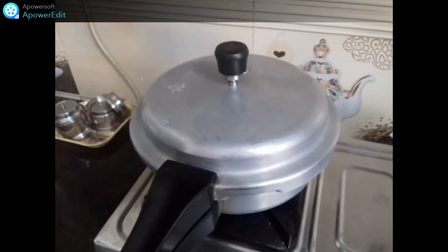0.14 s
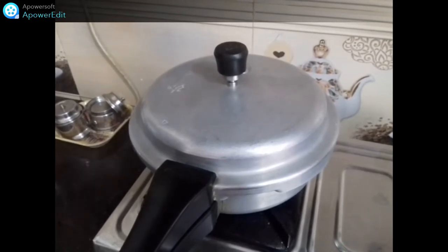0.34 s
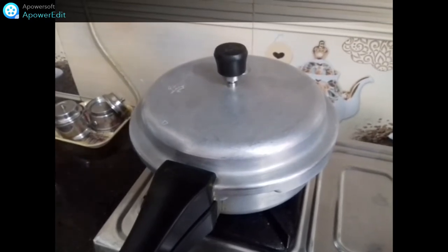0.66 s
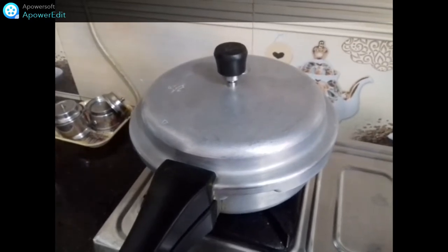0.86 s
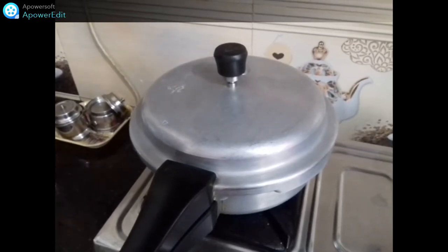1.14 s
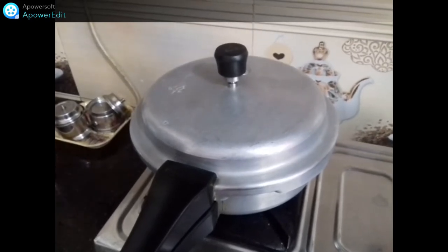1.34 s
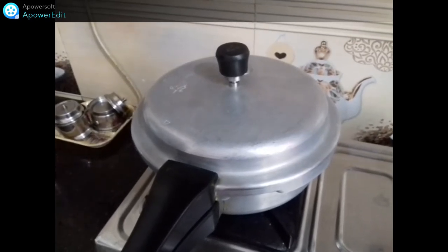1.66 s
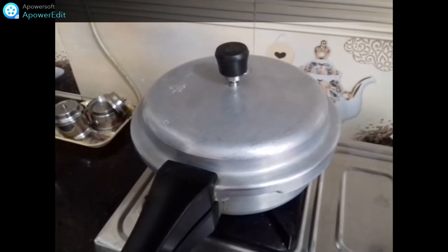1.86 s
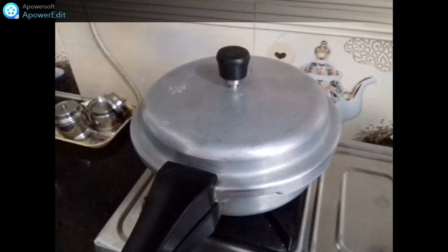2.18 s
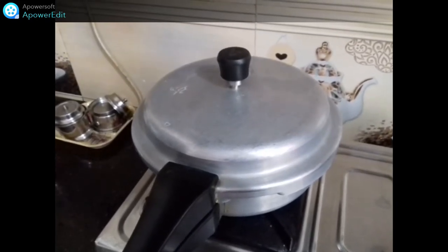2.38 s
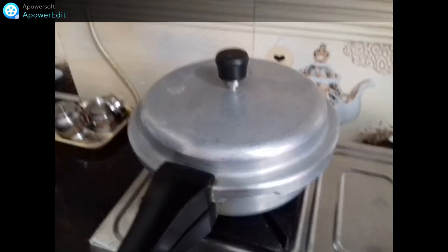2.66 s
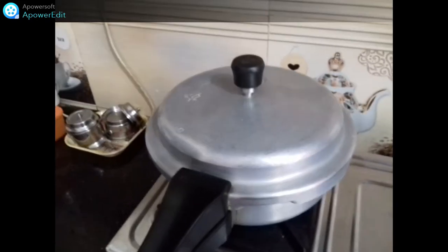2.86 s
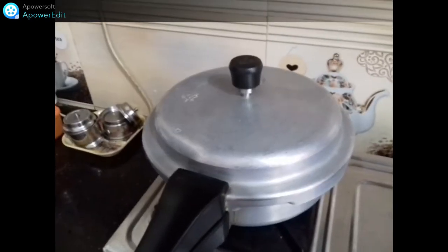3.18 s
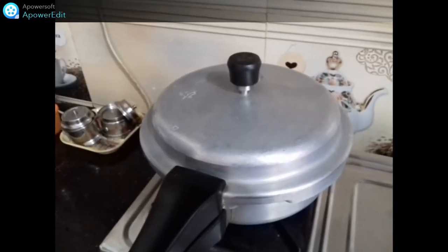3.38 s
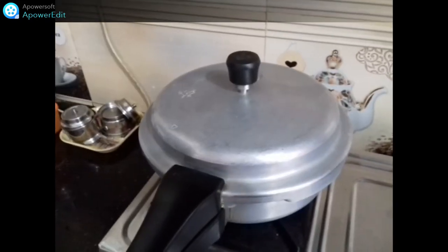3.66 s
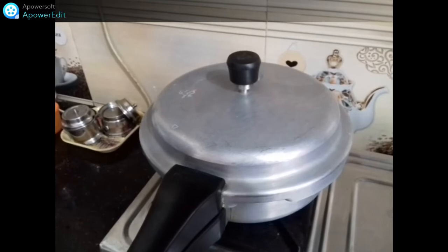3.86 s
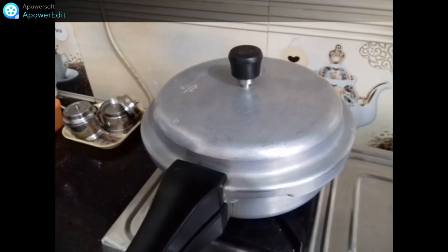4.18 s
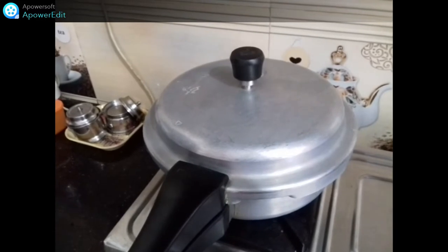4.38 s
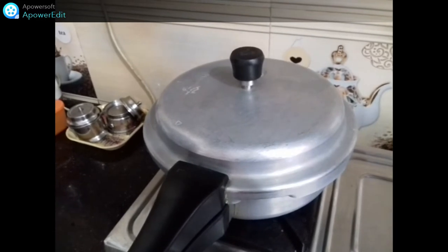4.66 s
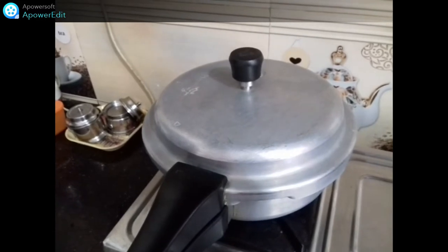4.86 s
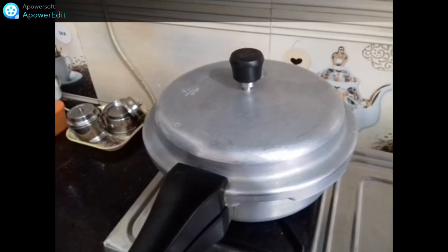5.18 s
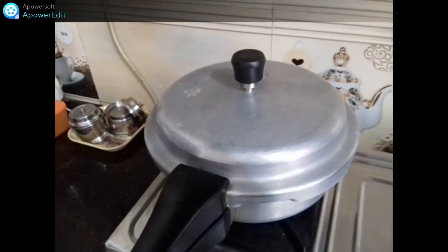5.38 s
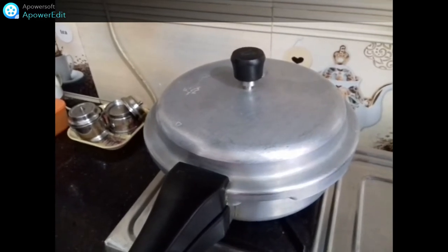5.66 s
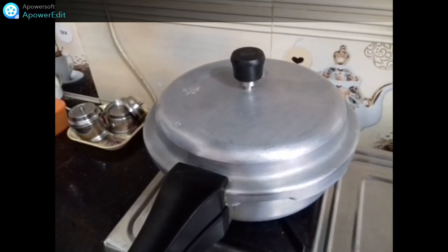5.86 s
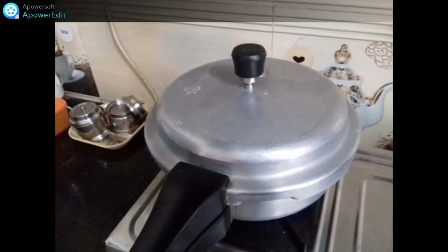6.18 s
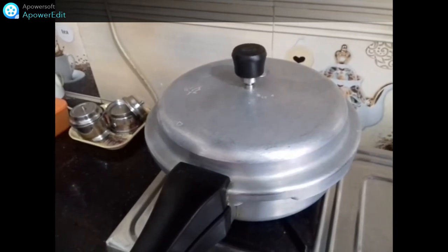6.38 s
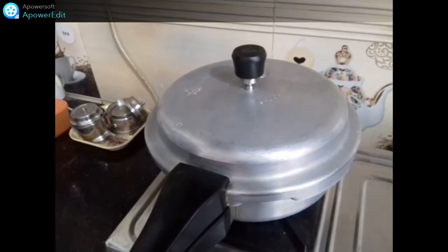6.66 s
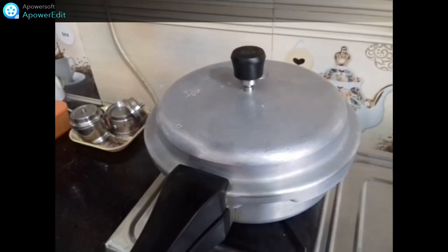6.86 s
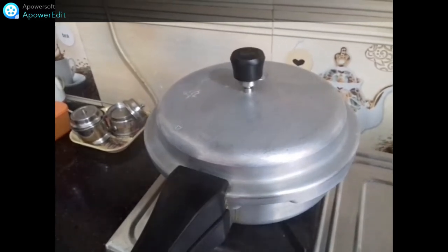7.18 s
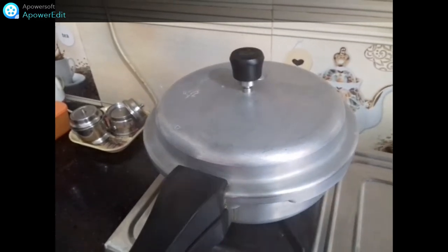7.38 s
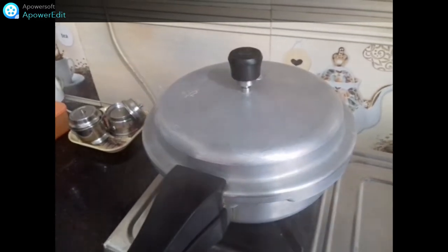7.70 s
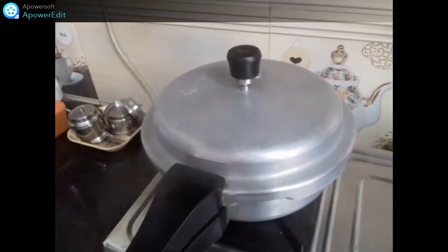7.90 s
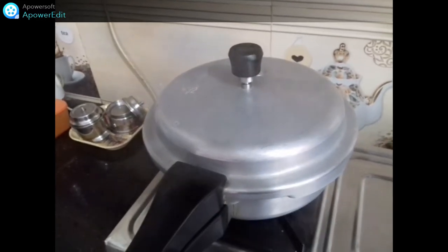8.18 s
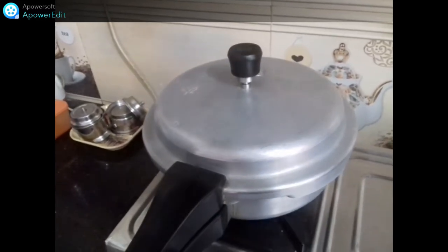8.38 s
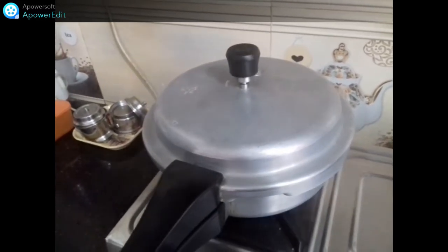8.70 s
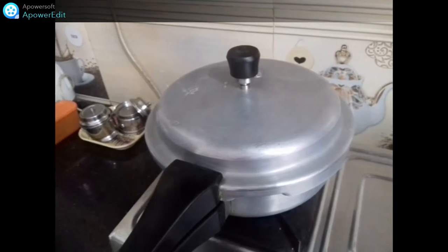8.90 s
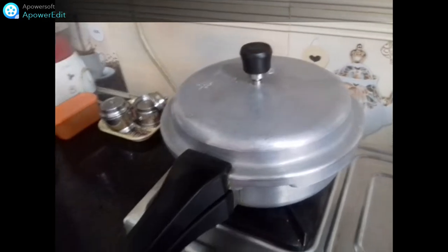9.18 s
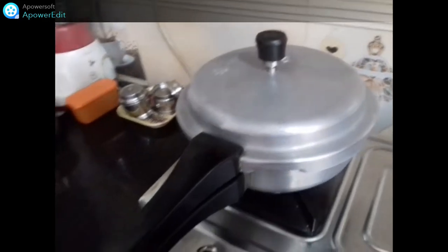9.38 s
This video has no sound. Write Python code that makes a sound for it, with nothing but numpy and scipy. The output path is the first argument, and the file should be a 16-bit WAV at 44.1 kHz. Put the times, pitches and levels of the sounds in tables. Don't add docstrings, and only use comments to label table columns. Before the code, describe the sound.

Very close in a small tiled kitchen, a pressure cooker blasts harsh, whistling steam that crackles in the overloaded microphones. The weight drops with a metallic rattle and the hiss nearly vanishes. After an abrupt change the valve sputters in quick puffs over a dull burner and street murmur, with a knock, a small plink and a faint two-tone horn. Then the weight jolts up and the steam roars to the end.

```python
import sys
import numpy as np
from scipy import signal
from scipy.fft import rfft, irfft, next_fast_len
from scipy.io import wavfile
from scipy.ndimage import uniform_filter1d

SR = 44100
rng = np.random.default_rng(int(sys.argv[2]) if len(sys.argv) > 2 else 0)


def gain_from_db(level_db):
    decades = np.asarray(level_db, float) / 20
    return 10 ** decades


def generate_wav(sig):
    pcm = np.round(np.clip(np.atleast_2d(sig).T, -1, 1) * 32767).astype(np.int16)
    wavfile.write(sys.argv[1], SR, pcm)


N = 420713

# time in seconds, lift from 0 to 1.
WEIGHT_LIFT = [
    (0, 0.78),
    (2.13, 0.5),
    (2.3, 0),
    (6.05, 0.32),
    (6.09, 0),
    (6.12, 0.9),
    (9.6, 0.79),
]
# time in seconds, dB over the steady flow,
# length in seconds.
VALVE_PUFFS = [(2.733, 4, 0.012), (2.834, 8, 0.038), (2.906, 5.5, .04), (3.005, 7, 0.057),
               (3.146, 3, 0.033), (3.249, 1, .05), (3.364, 6.5, 0.033), (3.425, 5, 0.031),
               (3.673, 4, 0.024), (3.75, 6, 0.06), (3.88, 4, 0.078), (3.975, 4, 0.031), (4.12, 11, 0.044),
               (4.226, 5.5, 0.046), (4.321, 5.5, 0.081), (4.455, 5, 0.053), (4.548, 0.5, 0.022),
               (4.64, 10, 0.062), (4.815, 10.5, 0.14), (4.945, 9.5, 0.044), (5.117, 8, 0.023),
               (5.164, 5.5, 0.019), (5.226, 6.5, 0.018), (5.435, 2.5, 0.21), (5.54, 10, 0.047),
               (5.68, 11.5, 0.085), (5.76, 8.5, 0.088), (5.886, 6, 0.036)]
PUFF_RISE = 0.92


def evened(x):
    return x / np.sqrt(np.mean(x ** 2) + 1e-20)


def read(points, hz):
    f, value = np.transpose(points)
    return np.interp(np.log(hz + 1), np.log(f + 1), value)


def columns(rows, t):
    s, *values = np.transpose(rows)
    return [np.interp(t, s, v) for v in values]


def coloured(x, points):
    size = next_fast_len(N)
    gain = gain_from_db(read(points, np.fft.rfftfreq(size, 1 / SR)))
    return irfft(rfft(x, size) * gain, size)[..., :N]


def wander(shape, seconds):
    width = max(int(seconds * SR), 2)
    once = uniform_filter1d(rng.standard_normal(shape), width)
    return evened(uniform_filter1d(once, width))


def resonate(x, hz, width):
    return signal.lfilter(*signal.iirpeak(hz, hz / width, SR), x)


def bumps(rows, t, rise=1):
    s, length = np.array([(row[0], row[2]) for row in rows]).T[..., None]
    late = (t - s) / length
    return np.exp(-3 * (late / np.where(late < 0, rise, 1)) ** 2)


def heights(rows, t, column=1, rise=1):
    ms = np.arange(0, N / SR, 1 / 1000)
    return np.interp(t, ms, np.transpose(rows)[column] @ bumps(rows, ms, rise))


def flow(t):
    # time in seconds, steady flow in dB; blast, shut, scene change, leak, blast.
    steady_flow = [(0, -16.5), (2.12, -16.5), (2.18, -27.5), (2.23, -35), (2.46, -61.5), (2.716, -66.5),
                   (2.724, -33), (4.0, -30), (5.9, -29.5), (6.0, -23), (6.065, -13.5), (6.2, -16),
                   (8.8, -16), (9.54, -17)]
    return columns(steady_flow, t)[0] + heights(VALVE_PUFFS, t, rise=PUFF_RISE)


def vent_colours(hz):
    # frequency in Hz, level in dB per Hz.
    leak_hiss = [(700, -39.5), (1400, -29), (2400, -21), (3700, -16), (4200, -20.5), (6360, -13),
                 (7140, -2), (8520, -1.5), (10000, -12), (11000, -20.5), (12500, -6.5), (14000, -16),
                 (15700, -15)]
    # frequency in Hz, level in dB per Hz.
    blast_hiss = [(500, -32), (1200, -25.5), (2300, -18.5), (2900, -13.5), (3970, -12.5), (5630, -15),
                  (6430, -10.5), (7400, -6), (8180, -1), (9000, -10), (10100, -12.5), (13700, -8.5),
                  (15700, -10.5)]
    # frequency in Hz, width in Hz, dB over the jet when seated, dB when lifted.
    cavities = [(2700, 57, 0.5, 4), (3030, 370, 6, 1.5), (3715, 33, 14, 6.5), (3990, 16, 0, -2),
                (4344, 46, 7.5, 4), (5190, 51, -1.5, 6.5), (6470, 46, 13.5, 0.5), (6900, 44, -14, 2),
                (7300, 53, 10, -1.5), (7775, 100, 7, 1), (8334, 45, 6.5, 6), (8460, 80, 6, -2.5),
                (9600, 100, -2, 4.5), (10580, 85, 16, 4.5)]
    seated_db, lifted_db = read(leak_hiss, hz), read(blast_hiss, hz)
    for f, width, shut_db, open_db in cavities:
        ring = 1 / (1 + (2 * (hz - f) / width) ** 2)
        seated_db = seated_db + shut_db * ring
        lifted_db = lifted_db + open_db * ring
    return seated_db, lifted_db


def hiss(patchy_db=1.35, usual_puff_db=5):
    # frequency in Hz, likeness from 0 to 1.
    likeness = [(60, 1), (5000, .9), (6500, .8), (8000, .7), (10000, .6), (13000, 0.4), (16000, .4)]
    # frequency in Hz, left minus right in dB.
    side_lean = [(60, -19), (5000, 1), (6500, -2), (8100, -4), (10000, -0.5), (16000, -1.5)]
    # frequency in Hz, share from 0 to 1.
    puff_share = [(2000, .4), (4500, .62), (6500, 1)]
    frames, hz = N // 256 + 5, np.fft.rfftfreq(1024, 1 / SR)
    t = np.arange(frames) * 256 / SR
    a, b, c, d, patches = rng.standard_normal((frames, 513, 5)).T
    patches = evened(uniform_filter1d(uniform_filter1d(patches, 14, 0), 8, 1))

    lift, = columns(WEIGHT_LIFT, t)
    seated_db, lifted_db = vent_colours(hz)
    size = gain_from_db(np.outer(seated_db, 1 - lift) + np.outer(lifted_db, lift))
    core = (hz > 6000) & (hz < 9500)
    size *= gain_from_db(patchy_db * patches) / np.linalg.norm(size[core], axis=0)
    puff_db = heights(VALVE_PUFFS, t, rise=PUFF_RISE)
    over_usual_db = puff_db - usual_puff_db * (puff_db > 1 / 100)
    size *= gain_from_db(np.outer(read(puff_share, hz) - 1, over_usual_db))

    same = np.clip(read(likeness, hz), -1, 1)[:, None]
    lean = gain_from_db(read(side_lean, hz) / 2)[:, None]
    left = a + 1j * b
    right = same * left + np.sqrt(1 - same ** 2) * (c + 1j * d)
    z = np.array([left * lean, right / lean])
    return evened(signal.istft(z * size, nperseg=1024, noverlap=768)[1][:, :N])


def whistles(lift):
    # frequency in Hz, width in Hz, dB under the jet when seated, dB when lifted, swell in dB,
    # start in seconds, end in seconds.
    edge_tones = [
        (3706, 30, -39, -22, 3.5, -0.3, 2.1),
        (3890, 15, -23, -40, .5, 2.9, 3.93),
        (3137, 90, -34, -28, 2.5, -0.7, 10),
        (3800, 110, -32, -25.5, 2, 5, 11),
    ]
    out, t = np.zeros(N), np.arange(N) / SR
    for hz, width, seated_db, lifted_db, swell_db, start, end in edge_tones:
        narrow = resonate(rng.standard_normal(N), hz, width)
        tone = evened(resonate(narrow, hz, 2 * width))
        power = abs(uniform_filter1d(tone ** 2, round(SR / width / 4)))
        tone /= (.1 + power) ** .4
        sounding = np.clip(np.minimum(t - start, end - t) / 0.072, 0, 1)
        level_db = seated_db + (lifted_db - seated_db) * lift + swell_db * wander(N, 0.067)
        out += tone * sounding * gain_from_db(level_db)
    return out


def steam(spit_db=1.0, unrest_db=0.81, unrest_s=.03, echo_t60=.3):
    t = np.arange(N) / SR
    jet = hiss() + whistles(*columns(WEIGHT_LIFT, t))
    flow_db = flow(t) + unrest_db * wander(N, unrest_s)
    power = gain_from_db(flow_db + 3.0 + spit_db * wander(N, .003)) ** 2
    hold = np.exp(-np.log(1e6) / (echo_t60 * SR))
    echo = signal.lfilter([1 - hold], [1, -hold], power)
    return jet * np.sqrt(power + 0.28 * echo)


def hits():
    # frequency in Hz, level in dB, width in Hz.
    lid = [(990, 8.5, 110), (1495, 13, 66), (1830, -8, 90), (760, -28, 200), (2800, -8, 1800)]
    # frequency in Hz, level in dB, width in Hz.
    knock = [(1000, -2, 380), (1500, -3, 540), (2190, -1, 610), (2920, -2, 200), (3580, -10, 58)]
    # frequency in Hz, level in dB, width in Hz.
    plink = [(1484, -2.5, 31), (1160, -16, 60)]
    # time in seconds, tick in dB, rattle in dB, 60 dB decay of the rattle in seconds.
    strokes = [
        (2.136, -36, -26.5, 0.42),
        (3.36, -14.5, -30.5, 0.28),
        (3.612, -23.5, -44, 0.37),
    ]
    out, t = np.zeros(N), np.arange(SR // 2) / SR
    for (s, tick_db, rattle_db, t60), body in zip(strokes, (lid, knock, plink)):
        noise = rng.standard_normal(len(t))
        tick, rattle = np.zeros(len(t)), np.zeros(len(t))
        for hz, db, width in body:
            tick += gain_from_db(db) * np.exp(-np.pi * width * t) * np.sin(2 * np.pi * hz * t)
            rattle += gain_from_db(db) * evened(resonate(noise, hz, width))
        tick *= np.minimum(t / .0006, 1)
        stroke = gain_from_db(tick_db) * tick + gain_from_db(rattle_db - 60 * t / t60) * evened(rattle)
        out[round(s * SR):][:len(t)] += stroke
    return out


def horn(waver=.005, fading=1.1, horn_db=-50.5, overtone_db=-2.5, start=3.91, end=6.05):
    # frequency in Hz, then levels of partials 1 to 3 in dB.
    reeds = [
        (724, 0.95, 4, 0.5),
        (775, 5.8, 0.67, -4),
    ]
    # time in seconds, dB over the steady level,
    # length in seconds, brightness in dB.
    wind_swells = [(3.97, 2.5, .1, 1.5), (4.2, 9, 0.18, -2), (4.36, 9.5, 0.047, -6), (4.62, 8.5, 0.19, 2),
                   (4.87, 4, 0.15, 5.5), (5.16, 8, 0.17, 0), (5.43, 12.5, .14, -6.5), (5.7, 6, .2, -1),
                   (5.98, 10.5, 0.22, 0)]
    t = np.arange(N) / SR
    level_db = horn_db + heights(wind_swells, t)
    bright_db = overtone_db + heights(wind_swells, t, column=3)
    out = np.zeros(N)
    for hz, *partials in reeds:
        turns = np.cumsum(hz * (1 + waver * wander(N, 0.019))) / SR
        for k, db in enumerate(partials):
            paths = 1 + fading * (wander(N, .018) + 1j * wander(N, .018))
            tone = evened((paths * np.exp(2j * np.pi * (k + 1) * turns)).real)
            out += tone * gain_from_db(db + bright_db * min(k, 1))
    sounding = np.clip(np.minimum(t - start, end - t) / 0.034, 0, 1)
    return out * gain_from_db(level_db) * sounding


def kitchen():
    # frequency in Hz, level in dB per Hz.
    murmur_colour = [(25, -12), (45, -26), (70, -38), (97, 1.5), (133, -7), (198, -2), (241, -4.5),
                     (280, -2), (570, -3.5), (680, -5.5), (980, -3), (2500, -13), (5640, -26), (9000, -20)]
    # time in seconds, level in dB.
    murmur_db = [
        (0, -74.5),
        (2.5, -59),
        (2.718, -58),
        (2.722, -42.5),
        (6.0, -41.5),
        (6.15, -58),
        (9.6, -69),
    ]
    t = np.arange(N) / SR
    level_db, = columns(murmur_db, t)
    near, apart = rng.standard_normal((2, N))
    pair = np.array([near + 0.13 * apart, near - 0.22 * apart])
    murmur = evened(coloured(pair, murmur_colour))
    thin = signal.lfilter(*signal.butter(N=1, Wn=250, btype="high", fs=SR), murmur)
    murmur = np.where(np.arange(N) < murmur_db[2][0] * SR, thin, murmur)
    return murmur * gain_from_db(level_db + 0.75 * wander(N, 0.01))


def scene():
    return steam() + hits() + horn() + kitchen()


def overloaded(dry):
    # time in seconds, overload point left in dB, right in dB, click size in dB, share of bass let
    overload = [
        (0, -2.5, -5, -4.5, 0.25),
        (2.2, -3.5, -4.5, -3.5, 0.35),
        (6.105, 11, -3.5, -17, 1.2),
        (6.115, -5.5, -8, -9, 0.83),
        (7.28, -6, -9, -11.5, 0.75),
        (7.34, -5.5, -7, -7.5, 0.15),
        (9.6, -4, -6, -7, 0.2),
    ]
    # frequency in Hz, level in dB.
    crackle_colour = [(25, -32), (80, 5.5), (150, 9), (1500, 8), (3000, 5), (6000, 1), (16000, -9)]
    # time in seconds,
    # depth in dB, length in seconds.
    lulls = [(.367, 6, .02), (.529, 5, 0.016), (.74, 3, 0.015), (.885, 5.5, 0.026), (1.032, 4, 0.019),
             (1.097, 6, 0.015), (1.2, 8, 0.031), (1.42, 4.5, .02), (1.464, 9, 0.011), (1.645, 0.5, 0.017),
             (1.675, 2, 0.024), (1.837, 1, 0.015), (1.967, 0, .02), (6.307, 2.5, 0.034), (7.58, 1, 0.047),
             (8.9, 0.5, 0.027), (9.19, 2, 0.0099), (9.47, 1, 0.052)]
    gust_db, gust_s = -0.25, .008
    give, give_s, blast_db = 0.93, .015, -12.5
    t = np.arange(N) / SR
    left_db, right_db, click_db, bass = columns(overload, t)
    swing_db = heights(lulls, t) + gust_db * wander(N, gust_s)
    point = gain_from_db(np.array([left_db, right_db]) + swing_db)
    level = np.sqrt(abs(uniform_filter1d(dry ** 2, round(give_s * SR))))
    point = point * np.clip(level / gain_from_db(blast_db), .7, 1.4) ** give
    excess = np.maximum(abs(dry) - point, 0) ** 0.22
    clicks = coloured(excess * rng.choice([-1., 1.], dry.shape), crackle_colour) * gain_from_db(click_db + 9)
    thin = signal.lfilter(*signal.butter(N=1, Wn=700, btype="high", fs=SR), clicks)
    return dry + bass * clicks + (1 - bass) * thin


def starved(x, quiet_db=-45):
    # frequency in Hz, weak sum, weak difference,
    # blast sum, blast difference.
    thrift = [(0, -9, 3, -9, -9), (2400, -9, 4, -9, -4), (3400, -9, 4, -9, -.9), (6100, -6, 4, -5, -.8),
              (8400, -2.6, -2.5, -1.5, -.8), (9300, -.7, -.5, -1.2, -.5), (11000, .4, -1, -1.2, -.6),
              (15500, .7, 0, -1.6, -.7)]
    hz, t, (left, right) = signal.stft(x, SR, nperseg=1024, noverlap=768)
    blocks, bands = np.arange(len(t)) // 4, np.arange(len(hz)) // 16
    block_s = blocks * 1024 / SR
    draws = rng.standard_normal((blocks[-1] + 1, bands[-1] + 1, 4)).T
    lasting = evened(uniform_filter1d(draws[:2], size=4))
    short = evened(draws[2:])
    brief = .45 * lasting + .9 * short + np.reshape([-.3, -.2], (2, 1, 1))

    blast = columns(WEIGHT_LIFT, block_s)[0] > .5
    flow_db = flow(block_s)
    plenty = .05 * np.clip(flow_db + 28, -8, 12)
    need = np.reshape(columns(thrift, bands * 16 * hz[1]), (2, 2, -1, 1))
    weak_kept = lasting[:, bands][:, :, blocks] + plenty > need[0]
    blast_kept = brief[:, bands][:, :, blocks] > need[1]
    kept = np.where(blast, blast_kept, weak_kept)
    both, apart = np.array([left + right, left - right]) * kept
    z = np.array([both + apart, both - apart]) / 2
    z *= ~np.outer(hz > 9600, flow_db < quiet_db) * (hz < 15850)[:, None]
    return signal.istft(z, SR, nperseg=1024, noverlap=768)[1][:, :N]


def band_limit(x):
    return signal.sosfilt(signal.butter(12, 16660, fs=SR, output="sos"), x)


def record(dry):
    limited = .95 * np.tanh(overloaded(dry) / .95)
    cut = signal.lfilter(*signal.butter(N=2, Wn=46, btype="high", fs=SR), limited)
    mix = starved(cut)
    return band_limit(mix)


dry = scene()
out = record(dry)
generate_wav(out)
```